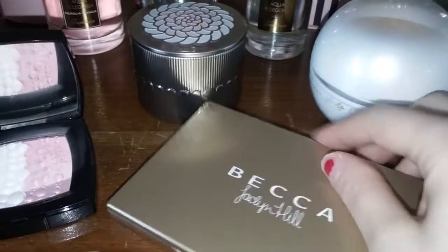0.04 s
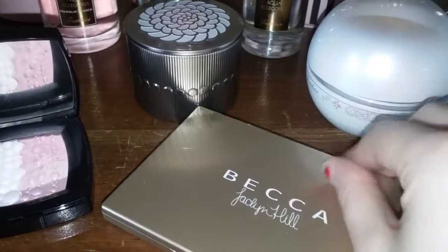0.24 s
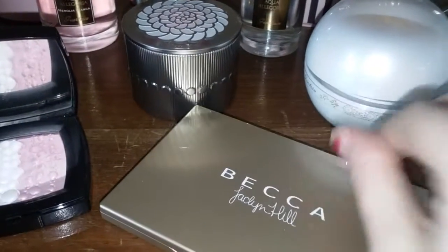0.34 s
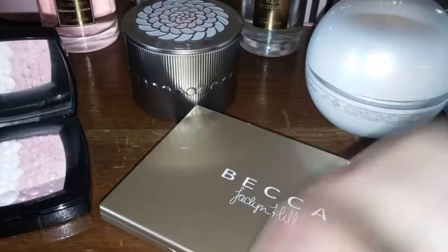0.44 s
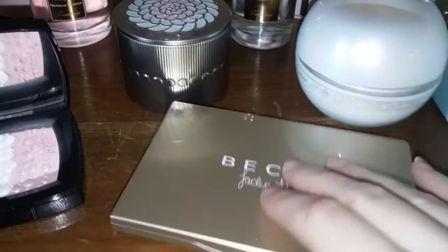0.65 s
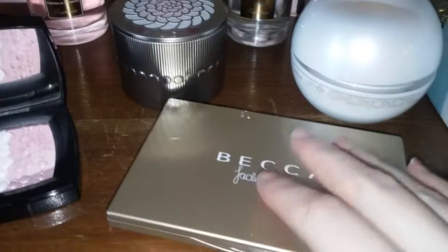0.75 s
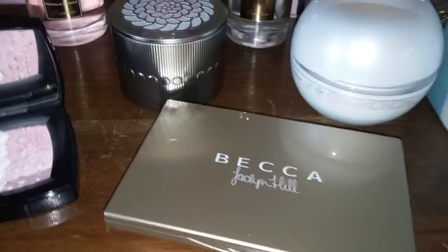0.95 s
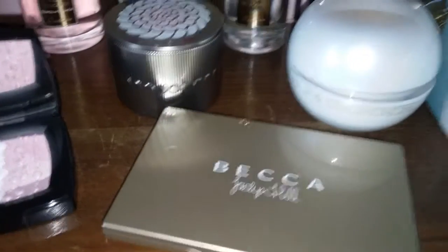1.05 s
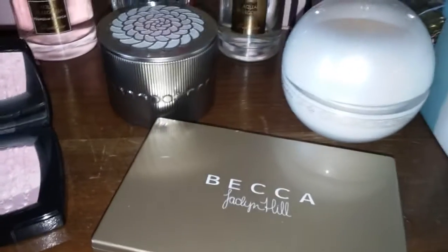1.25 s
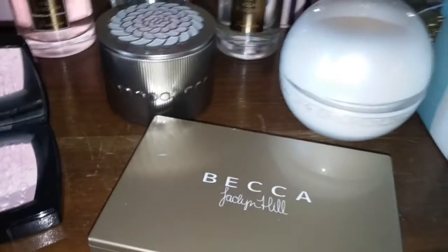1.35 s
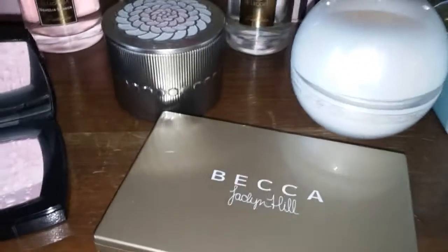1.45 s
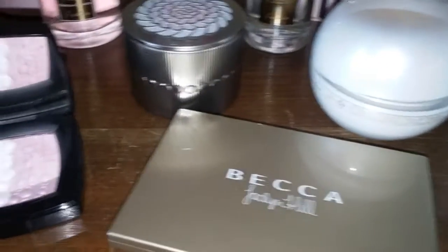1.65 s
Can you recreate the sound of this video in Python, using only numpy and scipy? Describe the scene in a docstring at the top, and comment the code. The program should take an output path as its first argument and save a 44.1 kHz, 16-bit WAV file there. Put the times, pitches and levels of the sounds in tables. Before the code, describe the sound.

A flat plastic compact snaps shut with a quick, bright double clack on a wooden table, then fingertips tap and slide very softly over it; close microphone in a quiet room with low hum.

```python
"""Quiet room air comes first: noise shaped by a spectrum, flickering slowly, over a narrow-band noise hum.
From 0.24 s a flat plastic make-up compact on a wooden table snaps shut in a few quick contacts; each one
excites decaying modes of case and table and a short bright crack, and a tail of dying noise follows.
From 0.58 s fingertips tap the case and slide over it, as hiss and small random slips that ring the modes.
Near 1 s a faint rustle is heard as the hand leaves, and the air remains."""
import sys
import numpy as np
from scipy import signal
from scipy.fft import rfft, irfft
from scipy.io import wavfile

SR = 44100
rng = np.random.default_rng(int(sys.argv[2]) if len(sys.argv) > 2 else 0)


def wav_record(signal):
    """Record a signal, one row per channel, as 16-bit PCM in the file named by sys.argv[1]."""
    frames = np.transpose(np.atleast_2d(signal))
    bounded = np.clip(frames, -1, 1)
    # unit amplitude maps onto the largest positive 16-bit level
    quanta = np.round(bounded * 32767).astype(np.int16)
    wavfile.write(sys.argv[1], SR, quanta)


def invert_db(x):
    """Field ratio 10**(x/20) for x, a level in decibels (scalar or array-like)."""
    u = np.asarray(x, float) / 20
    return 10 ** u


N = 74970


def rms_one(x):
    """Normalisation: mean power is set to 1."""
    return x / np.sqrt(np.mean(x ** 2) + 1e-20)


def at_hz(points, hz):
    """Interpolation on a logarithmic frequency axis, as pitch is heard."""
    table_hz, values = np.transpose(points)
    return np.interp(np.log(hz), np.log(table_hz), values)


def in_time(rows, outside=None):
    """Envelope: linear interpolation between breakpoints at every sample."""
    times_s, values = np.transpose(rows)
    return np.interp(np.arange(N) / SR, times_s, values, outside, outside)


def coloured(x, spectrum):
    """Linear filtering: multiplication by a gain curve in the frequency domain."""
    hz = np.maximum(np.arange(len(x) // 2 + 1) * SR / len(x), 1)
    return irfft(rfft(x) * invert_db(at_hz(spectrum, hz)), len(x))


def drift(rate_hz):
    """Slow random modulation: low-passed noise of rms 1, computed at every 40th sample."""
    r = np.exp(-2 * np.pi * rate_hz * 40 / SR)
    # the first 2000 values let the filter settle
    slow = signal.lfilter([1], [1, -2 * r, r * r], rng.standard_normal(N // 40 + 2002))[2000:]
    return np.interp(np.arange(N) / 40, np.arange(len(slow)), rms_one(slow))


# room air spectrum: pitch_hz [Hz], level_db [dB, relative]
AIR_SPECTRUM = [(18, -60), (30, -38), (53, -18), (68, -15), (90, 3.5), (118, -16.5), (157, -0.5),
                (199, -10.5), (233, -4.5), (259, -14), (364, -7.5), (473, -10), (512, -12.5), (554, -15.5),
                (1130, -16), (2060, -11), (3220, -38.5), (14800, -37.5), (16000, -30.5)]
# rise and fall of the air: time_s [s], level_db [dB; the mean counts fully, departures from it in part]
AIR_LEVEL_CURVE = [(0.0, -48), (0.17, -48.5), (0.288, -55.5), (0.59, -51), (0.794, -48.5), (1.43, -52),
                   (1.7, -50.5)]


def air():
    """Broadband noise with slow amplitude modulation, plus a hum: noise through a narrow resonance."""
    noise_gain_db, swing_share = 4, 0.47
    hum_hz, hum_width_hz, hum_db = 90, 56, -59.5
    level_db = in_time(AIR_LEVEL_CURVE)
    mean_db = level_db.mean()
    noise = rms_one(coloured(rng.standard_normal(N), AIR_SPECTRUM))
    bass = signal.sosfiltfilt(signal.butter(2, 300, fs=SR, output="sos"), noise)
    hiss = signal.sosfiltfilt(signal.butter(4, 2900, "high", fs=SR, output="sos"), noise)
    middle = noise - bass - hiss
    # flicker: rms depth in dB, rate in Hz; least in the hiss
    bass = bass * invert_db(2.0 * drift(7.7))
    middle = middle * invert_db(1.5 * drift(25.5))
    hiss = hiss * invert_db(0.66 * drift(11))
    r = np.exp(-np.pi * hum_width_hz / SR)
    resonance = [1, -2 * r * np.cos(2 * np.pi * hum_hz / SR), r * r]
    hum = signal.lfilter([1, 0, -1], resonance, rng.standard_normal(N + SR))[SR:]
    air_db = mean_db + noise_gain_db + swing_share * (level_db - mean_db)
    return invert_db(air_db) * (bass + middle + hiss) + invert_db(hum_db) * rms_one(hum)


def ring(clicks, hz, t60):
    """Damped resonance: a unit click starts a decaying sine of height 1."""
    r, w = invert_db(-60 / (t60 * SR)), 2 * np.pi * hz / SR
    return signal.lfilter([0, np.sin(w)], [1, -2 * r * np.cos(w), r * r], clicks + 1e-18)


def strike(modes, start_s, level_db):
    """Modal superposition: each contact excites every mode, with a random strength for each pair."""
    spread_db = 1.5 * rng.standard_normal((len(start_s), len(modes)))
    out = 0
    for k, (hz, mode_db, t60) in enumerate(modes):
        clicks = np.zeros(N)
        clicks[(start_s * SR).astype(int)] = invert_db(level_db + mode_db + spread_db[:, k])
        out = out + (-1) ** k * ring(clicks, hz, t60)  # neighbours in opposite phase
    return out


def band_passed(x):
    """Band limiting: the case's ring is heard only between two steep edges in Hz."""
    return signal.sosfilt(signal.butter(3, [640, 2640], "band", fs=SR, output="sos"), x)


# upper modes of the case: pitch_hz [Hz], level_db [dB, relative], t60_s [s]
UPPER_MODES = [(1752, -4, 0.013), (1991, 2.5, .022), (2360, -3, 0.01), (2790, -27, 0.049)]
# lower modes of the case: pitch_hz [Hz], level_db [dB, relative], t60_s [s]
LOWER_MODES = [(973, -11, 0.01), (1199, -4.5, 0.016), (1470, 1.5, 0.022)]


def case_ring(start_s, ring_db, lower_db):
    """Modal vibration of the plastic shell: contacts weight its upper and lower modes differently."""
    upper = strike(UPPER_MODES, start_s, ring_db)
    lower = strike(LOWER_MODES, start_s, ring_db + lower_db)
    return band_passed(upper + lower)


# table top modes: pitch_hz [Hz], level_db [dB, relative], t60_s [s]
TABLE_MODES = [(94, -19.5, 0.12), (206, -6, 0.044), (260, -7.5, 0.061), (362, -5, 0.061), (485, -3, 0.037),
               (624, -8, 0.044), (740, -9.5, 0.038)]


def table_thud(start_s, thud_db):
    """Contact softness: a yielding contact excites the table top through a two-pole low-pass."""
    soft_hz = 1020
    r = np.exp(-2 * np.pi * soft_hz / SR)
    return signal.lfilter([(1 - r) ** 2], [1, -2 * r, r * r], strike(TABLE_MODES, start_s, thud_db))


# crack spectrum: pitch_hz [Hz], level_db [dB, relative]
CRACK_SPECTRUM = [(1760, -8.5), (3000, -0.5), (4050, -13.5), (4500, -17), (5200, -2.5), (6100, -7),
                  (7940, -13.5), (9270, -7.5), (16000, -30)]


def crack(start_s, crack_db):
    """Impact noise: each contact opens an exponentially decaying burst of bright noise."""
    t60_s = 0.0063
    clicks = np.zeros(N)
    clicks[(start_s * SR).astype(int)] = invert_db(crack_db)
    envelope = signal.lfilter([1], [1, -invert_db(-60 / (t60_s * SR))], clicks)
    return envelope * rms_one(coloured(rng.standard_normal(N), CRACK_SPECTRUM))


# contacts on the case, lid snap then fingertips: start_s [s], ring_db [dB],
# lower_db [dB, lower modes relative to ring_db], thud_db [dB, table], crack_db [dB]
CASE_CONTACTS = [(.2426, -8.5, -10, -25, -38), (.2438, -19, -21, -37, -39.5),
                 (0.2618, -8.5, -1, -30, -15.5), (0.2638, -10.5, -16, -53, -21),
                 (0.266, -13.5, -7, -62, -30), (0.2712, -4.5, -6, -21, -21), (0.2736, -6, -5, -25, -30),
                 (.2770, -17.5, -10, -44, -35), (0.5846, -37.5, 1.5, -40, -44),
                 (.5875, -35.5, 6.5, -37.5, -62), (0.6449, -43, 9, -39, -49.5),
                 (0.6673, -32.5, -1, -26.5, -45.5), (0.7137, -30, -4, -30, -41.5),
                 (0.7155, -30.5, 6, -57, -51), (.7240, -33, -3, -51, -58), (0.7742, -57, 6.5, -63, -70),
                 (0.8429, -47, -1, -37.5, -59)]


def contacts():
    """Impact excitation: each contact sums a case ring, a table thud and a crack."""
    start_s, ring_db, lower_db, thud_db, crack_db = np.transpose(CASE_CONTACTS)
    return case_ring(start_s, ring_db, lower_db) + table_thud(start_s, thud_db) + crack(start_s, crack_db)


# decay time of the room tail: pitch_hz [Hz], t60_s [s]
TAIL_DECAY = [(150, 0.9), (400, 0.35), (700, 0.14), (1800, 0.21), (3000, 0.06), (5000, 0.31), (9000, 0.15),
              (14000, 0.4)]
# strength of the room tail: pitch_hz [Hz], level_db [dB, relative]
TAIL_LEVEL = [(150, -1.5), (400, -5.5), (700, 6), (1800, -14), (3000, -8), (4000, -0.5), (5000, -7.5),
              (9000, -8), (14000, -13)]


def room(x):
    """Diffuse reverberation: convolution with noise that decays exponentially band by band."""
    build_up_s = 0.0047
    t, tail = np.arange(SR // 2) / SR, 0
    white = rng.standard_normal((2, len(t)))  # neighbouring bands take different noise
    edges_hz = np.geomspace(30, 17000, 34)[4:]
    for k, (low, high) in enumerate(zip(edges_hz, edges_hz[1:])):
        hz = np.sqrt(low * high)
        band = signal.sosfilt(signal.butter(2, [low, high], "band", fs=SR, output="sos"), white[k % 2])
        t60 = at_hz(TAIL_DECAY, hz)
        decay = invert_db(at_hz(TAIL_LEVEL, hz) - 60 * t / t60)
        tail = tail + band * decay / np.sqrt(t60 * SR / 13.2)  # offsets the energy of a longer decay
    return signal.fftconvolve(x, tail * np.minimum(t / build_up_s, 1))[:N]


# fingers sliding on the lid, then a faint rustle as the hand leaves:
# time_s [s], level_db [dB, common to hiss, case and table]
SLIDE_LEVEL = [(0.6, -79), (0.625, -66.5), (0.67, -58.5), (0.705, -60.5), (0.73, -70), (0.76, -90),
               (0.95, -78), (0.995, -66.5), (1.06, -84), (1.1, -94)]
# hiss of skin on the lid: pitch_hz [Hz], level_db [dB, relative]
SLIDE_HISS_SPECTRUM = [(2060, -34), (3500, -15), (4490, -11), (6360, -2), (7650, -4), (8740, 3),
                       (16000, -10)]


def slide():
    """Stick-slip friction: skin catches on the lid, giving hiss and slips that ring case and table."""
    slips_per_s, case_db, table_db = 540, 16, 13
    level = invert_db(in_time(SLIDE_LEVEL, outside=-120))
    happens = rng.random(N) < slips_per_s / SR
    strength = invert_db(1.5 * rng.exponential(1, N))
    slips = happens * strength * rng.choice([-1, 1], N)
    case = sum(invert_db(db) * ring(slips, hz, t60) for hz, db, t60 in UPPER_MODES + LOWER_MODES)
    table = sum(invert_db(db) * ring(slips, hz, t60) for hz, db, t60 in TABLE_MODES)
    hiss = rms_one(coloured(rng.standard_normal(N), SLIDE_HISS_SPECTRUM))
    hiss = hiss * invert_db(2.0 * drift(60))
    return level * (hiss + invert_db(case_db) * rms_one(band_passed(case)) + invert_db(table_db) * rms_one(table))


def scene():
    """Superposition: air, contacts with their reverberation, and the slide add linearly."""
    hits = contacts()
    mix = air() + hits + room(hits) + slide()
    return mix[None]  # one channel


def band_limit(x):
    """A steep low-pass at the top of the band."""
    return signal.sosfilt(signal.butter(12, 16820, fs=SR, output="sos"), x)


def record(dry):
    """Saturation and band limiting: peaks are rounded, then the top and the deep bass are cut."""
    ceiling, top_hz, bass_cut_hz = .97, 16000, 52
    x = ceiling * np.tanh(dry / ceiling)
    # 70 dB down from just above top_hz
    x = signal.sosfilt(signal.cheby2(12, 70, top_hz * 1.04, fs=SR, output="sos"), x)
    x = signal.sosfilt(signal.butter(2, bass_cut_hz, "high", fs=SR, output="sos"), x)
    return band_limit(x)


dry = scene()
out = record(dry)
wav_record(out)
```